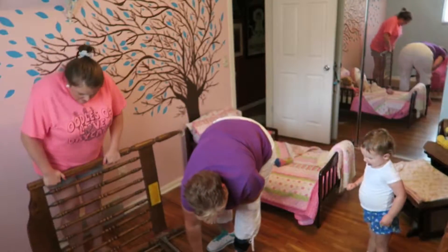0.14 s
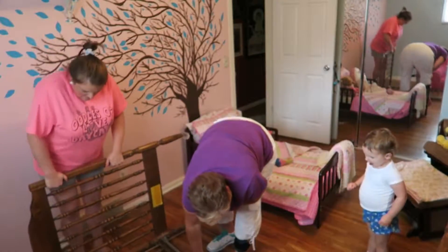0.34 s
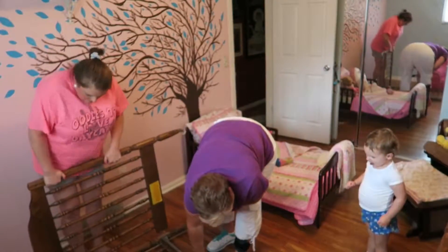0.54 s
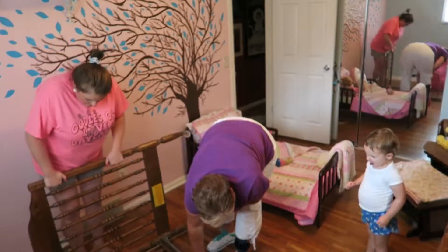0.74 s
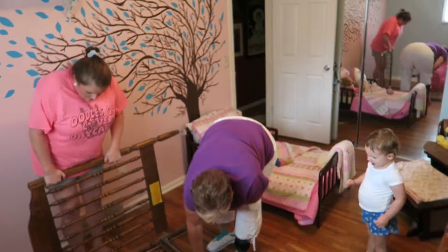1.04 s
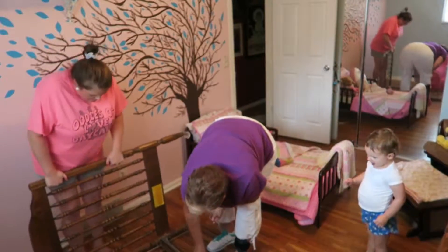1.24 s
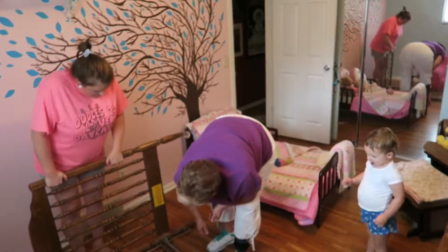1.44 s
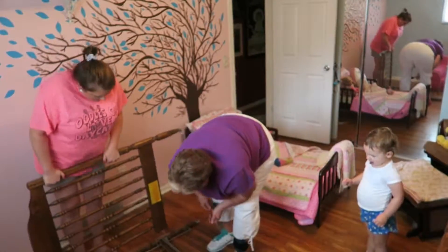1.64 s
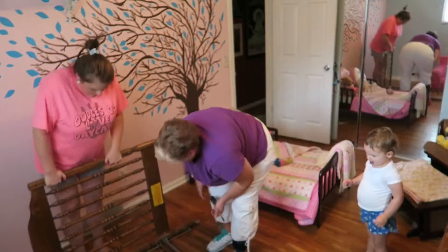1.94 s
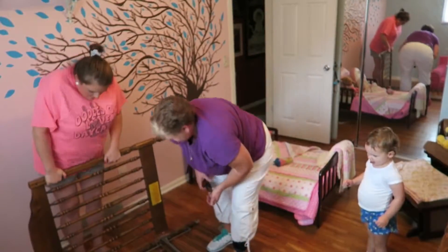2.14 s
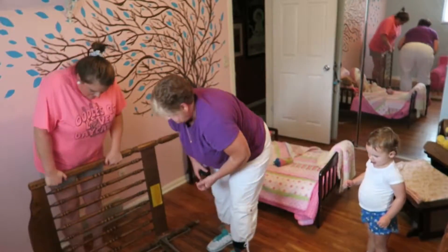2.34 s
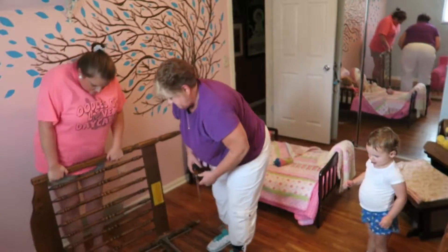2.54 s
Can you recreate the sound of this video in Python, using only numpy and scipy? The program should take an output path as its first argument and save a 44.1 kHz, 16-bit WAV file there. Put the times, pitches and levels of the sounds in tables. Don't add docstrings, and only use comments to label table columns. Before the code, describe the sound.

Sharp wood knocks and heavy floor thuds as a crib is pried apart in a bedroom

```python
import sys
import numpy as np
from scipy import signal
from scipy.fft import rfft, irfft
from scipy.io import wavfile
from scipy.ndimage import uniform_filter1d

SR = 44100
rng = np.random.default_rng(int(sys.argv[2]) if len(sys.argv) > 2 else 0)


def magnitude_from_level(level_db):
    exponent = np.asarray(level_db, float) / 20
    return 10 ** exponent


def output_pcm(signal):
    pcm = np.clip(np.atleast_2d(signal).T, -1, 1) * 32767
    wavfile.write(sys.argv[1], SR, np.round(pcm).astype(np.int16))


N = 119070


def read(points, hz):
    f, value = np.transpose(points)
    return np.interp(np.log(hz + 1), np.log(f + 1), value)


def evened(x):
    return x / np.sqrt(np.mean(x ** 2) + 1e-20)


def add(mix, start_s, sound):
    part = mix[round(start_s * SR):][:len(sound)]
    part += sound[:len(part)]


def colour(x, points):
    gain = magnitude_from_level(read(points, np.fft.rfftfreq(x.shape[-1], 1 / SR)))
    return irfft(rfft(x) * gain, x.shape[-1])


def rings(modes, t, spread=0., spread_db=0.):
    hz, db, t60_s = np.transpose(modes)[:, :, None]
    vary = rng.standard_normal((len(modes), 2))
    envelope = magnitude_from_level(db + spread_db * vary[:, :1] - 60 * t / t60_s)
    return (envelope * np.sin(2 * np.pi * hz * (1 + spread * vary[:, 1:]) * t)).sum(0)


def burst(t, hz, octaves, decay_s):
    away = np.log2((np.fft.rfftfreq(len(t), 1 / SR) + 1) / hz) / octaves
    half = np.exp(-t / decay_s / 2)
    phase = np.angle(rfft(rng.standard_normal(len(t)) * half ** 2))
    hump = irfft(np.exp(1j * phase) / (1 + away ** 6), len(t)) * np.sqrt(half)
    hump *= np.sqrt(decay_s * SR / 2) / np.linalg.norm(hump)
    return hump * np.minimum(t * hz / 2, 1)


def knock(start_s, db, hz, treble_db, body_db):
    contacts, spacing_s = 6, .002
    crack_octaves, crack_s, body_hz, body_s, snap_s = 0.54, 0.0045, 698, 0.0065, .009
    ring_db, ring_per_db, ring_t60_s = -3, .3, 0.051
    thin = hz > 2550
    t = np.arange(4000) / SR

    u = rng.random((contacts, 2))
    at = (u[:, 0] * np.arange(contacts) * spacing_s * SR).astype(int).clip(0, 599)
    hits = np.zeros(600)
    hits[at] = (0.24 + u[:, 1]) * 0.62 ** np.arange(contacts)
    hits[0] = 1

    crack = burst(t, hz, crack_octaves / (1 + thin), crack_s) / 2
    body = magnitude_from_level(body_db) * burst(t, body_hz, 1.0, body_s) / 2
    snap = magnitude_from_level(treble_db - 12.0) * burst(t, 3640, 1.184, snap_s) * np.minimum(t / 0.0034, 1)
    ring = magnitude_from_level(ring_db + ring_per_db * db - 60 * t / ring_t60_s) * np.sin(2 * np.pi * hz * t)
    sound = crack + body + thin * ring * np.minimum(t * hz / 2, 1)
    return start_s, magnitude_from_level(db + 1) * (signal.fftconvolve(sound, hits)[:len(t)] + snap)


def scrape():
    start_s, end_s, db, grow_db, slips_per_s = .524, .606, -16, 1, 250
    sag, limp_share = .22, .15
    # mode in Hz, level in dB, t60 in seconds.
    slat_modes = [(736, 6.5, 0.014), (482, 3, 0.015), (1000, 6.5, 0.014), (1232, 7, 0.018),
                  (1350, -1.5, 0.022)]
    t = np.arange(0, end_s - start_s, 1 / SR)
    done = t / t[-1]
    wander = .5 * uniform_filter1d(rng.standard_normal(N), 200)[:len(t)]
    turns = np.floor(np.cumsum(slips_per_s * (1 - sag * done + wander)) / SR)
    limp = 1 - limp_share * done * (turns % 2)
    slips = limp * np.diff(turns, prepend=-1) * (.85 + .3 * rng.random(len(t)))
    slips += .02 * rng.standard_normal(len(t))
    n = np.arange(3000)
    ring = rings(slat_modes, n / SR) * np.minimum(n / 44, 1) ** 2
    return start_s, magnitude_from_level(db) * signal.fftconvolve(slips * magnitude_from_level(grow_db * done), ring)


def rattle():
    contacts_per_s, rattle_db, shake_db, shake_follow = 360, -6, -35, 0.94
    # time in seconds, level in dB.
    shaking = [(0, -36), (0.299, -33.5), (0.418, -26), (0.498, -33.5), (0.849, -36.5), (.96, -43.5),
               (1.2, -41.5), (1.389, -40.5), (1.45, -84), (1.699, -55), (1.757, -27), (1.971, -49),
               (2.038, -38.5), (2.188, -47.5), (2.398, -31), (2.55, -43.5), (2.7, -41)]
    # frequency in Hz, density in dB per Hz.
    slat_tone = [(240, -38.5), (400, 10), (502, 0.5), (841, 1.5), (2540, 5), (6130, -13.5), (15000, -60)]
    floor_tone = [(25, -31.0), (62, 10.5), (130, 2.5), (300, -2.0), (450, -23.5), (2000, -51.0)]
    level_db = np.interp(np.arange(N) / SR, *np.transpose(shaking))
    clicks = (rng.random(N) < contacts_per_s / SR).astype(float)
    decay = np.exp(-np.arange(300) / SR / 0.0025)
    grains = signal.fftconvolve(clicks, decay)[:N] * rng.standard_normal(N)
    loose = magnitude_from_level(level_db + rattle_db) * evened(colour(grains, slat_tone))
    tremble = evened(colour(rng.standard_normal(N), floor_tone))
    return loose, magnitude_from_level(shake_db + shake_follow * (level_db + 43.5)) * tremble


def thud(start_s, db, hz, rail_db):
    deep_hz, deep_db, deep_t60_s, board_t60_s, rise_s = 65, -9.5, 0.22, .2, .007
    # mode in Hz, level in dB, t60 in seconds.
    rail_modes = [(145.6, 2, 0.13), (214.4, -9, 0.26), (245.7, 3.5, 0.1), (295.9, -4, 0.13),
                  (355.7, -8.5, 0.21), (523, -17.5, 0.16)]
    t = np.arange(SR // 2) / SR
    floor_modes = [(hz, 0, board_t60_s * (deep_hz / hz) ** 2), (deep_hz, deep_db, deep_t60_s)]
    boards = rings(floor_modes, t) * (1 - np.exp(-t / rise_s)) ** 2
    rail = magnitude_from_level(rail_db) * rings(rail_modes, t, spread=0.043, spread_db=2.) / 2
    rail *= magnitude_from_level(-1.0) * (1 - np.exp(-t / 0.0037)) ** 2
    return start_s, magnitude_from_level(db + 6.5) * (boards + rail)


def slam(start_s, db, hz, t60_s):
    t = np.arange(SR // 3) / SR
    return start_s, rings([(hz, db, t60_s)], t) * (1 - np.exp(-t / .0004))


def chink(start_s, db, share):
    bright_above_hz, bright_per_db = 8000, .8
    # mode in Hz, level in dB, t60 in seconds.
    fitting_a = [(6008, 0, .16), (9211, -8, .17), (10900, -10, .08)]
    fitting_b = [(6885, 0, .24), (4250, -10, .06)]
    t = np.arange(SR // 3) / SR
    struck = [(hz, mode_db + (hz > bright_above_hz) * bright_per_db * (db + 25), t60_s)
              for hz, mode_db, t60_s in fitting_a]
    ring = (1 - share) * rings(struck, t, spread_db=1.) + share * rings(fitting_b, t, spread_db=1.)
    buzz = magnitude_from_level(50 * uniform_filter1d(rng.standard_normal(len(t)), size=150))
    return start_s, magnitude_from_level(db + 1.5) * buzz * ring * (1 - np.exp(-t / 0.0004))


def room(x):
    # frequency in Hz, t60 in seconds.
    room_t60 = [(60, 0.86), (300, 0.35), (3000, 0.21), (14000, 0.27)]
    taps = np.zeros((2, SR))
    at = np.arange(100, SR - 20, 20) + rng.integers(0, 20, (2, (SR - 101) // 20))
    np.put_along_axis(taps, at, rng.choice([-1., 1.], at.shape), 1)
    hz, t, z = signal.stft(taps, SR, nperseg=256)
    decay = magnitude_from_level(-60 * t / read(room_t60, hz)[:, None])
    tail = signal.istft(z * decay, SR, nperseg=256)[1]
    return signal.fftconvolve(x[None], tail / np.linalg.norm(tail[0]), axes=1)[:, :N]


def rumble():
    # frequency in Hz, density in dB per Hz.
    house_tone = [(18, -48), (30, 7.5), (125, 3), (350, -12.5), (510, -33.5), (2290, -34.5), (12000, -70.5),
                  (15600, -108.5), (22000, -120)]
    return magnitude_from_level(-39.5) * evened(colour(rng.standard_normal((2, N)), house_tone))


def scene():
    # start in seconds, peak in dB, pitch in Hz, treble in dB, body in dB.
    knocks = [(0.157, -13.5, 1920, -15.5, -15), (0.231, 0.5, 2782, -47, -33), (0.329, -9.5, 1460, -9, -31),
              (0.3495, -3.5, 2130, -45, -9.5), (0.7565, -10, 2144, -51, -31),
              (0.608, -7.5, 2460, -14.5, -2), (0.976, -1.5, 2300, -1.5, -6), (0.9803, 6.5, 2284, -17.5, -9),
              (1.1875, -23, 2790, -1.5, -23), (1.3048, -26.5, 1340, -16, -35),
              (1.551, -27.5, 1700, -47, -5), (1.728, -18, 1370, -30, 1.5), (1.822, -18.5, 2710, -2.5, -9),
              (1.995, -27, 2170, -19, 8.5), (2.2095, -4, 2370, -12.5, -16), (2.319, -16.5, 2670, -0.5, -8),
              (2.5676, -24, 2030, -30, -4), (2.6265, -21.5, 2380, -11.5, -21)]
    # start in seconds, peak in dB, pitch in Hz.
    more_knocks = [(.005, -23, 2180), (0.089, -21.5, 2260), (.234, -7, 1856), (0.239, -21, 2790),
                   (0.258, -15, 2545), (0.373, -6, 1500), (0.393, -12, 1370), (.539, -9.5, 2370),
                   (.580, -6.5, 2500), (0.613, -13, 2290), (0.779, -23, 2350), (0.828, -16, 1990),
                   (0.97, -11.5, 2220), (.992, -10.5, 1500), (1.056, -14, 2530), (1.08, -22, 2330),
                   (1.188, -36, 4470), (1.235, -48, 2730), (1.2553, -28, 2790), (1.331, -27.5, 1964),
                   (1.368, -28, 1920), (1.574, -30.5, 1630), (1.6, -51, 4460), (1.684, -39, 1350),
                   (1.719, -33, 1300), (1.696, -38, 2870), (1.736, -19, 2370), (1.79, -50, 2440),
                   (1.883, -23, 2542), (2.006, -27, 2000), (2.025, -27.5, 2150), (2.088, -55, 2680),
                   (2.216, -14.5, 2566), (2.228, -7.5, 2260), (2.366, -19.5, 1760), (2.443, -26.5, 2700),
                   (2.672, -25.5, 1470)]
    # start in seconds, level in dB, floor pitch in Hz, rail in dB.
    thuds = [(0.238, -12, 62, -2), (0.331, 0.5, 96, -9), (.368, -12, 72.4, 2), (.265, -12, 62, -5),
             (0.411, -6, 66, -8.5), (.443, -10.5, 62.1, -6), (0.512, -15.5, 69.4, 1.5),
             (.6085, -2.5, 98.7, -0.5), (0.714, -36.5, 70.6, -34), (0.764, -19.5, 76, -7.5),
             (0.821, -14, 74.7, -3), (.973, 4, 83.2, -4), (1.1, -22, 69.5, -1.5),
             (1.291, -18.5, 75.8, -3.5), (1.556, -39, 61.2, -16), (1.727, 3, 89.4, -8),
             (1.798, -15, 91, -10.5), (1.870, -48, 91.5, -10), (1.992, -5, 86, -5.5),
             (2.037, -24.5, 67.5, 5.5), (2.066, -25, 93, 0), (2.223, 4.5, 90.5, -8.5),
             (2.296, -31, 74, -21), (2.362, -12.5, 81.2, -2), (2.398, -15.5, 87, -13)]
    # start in seconds, level in dB, pitch in Hz, t60 in seconds.
    slams = [
        (.6092, 6.5, 94, 0.098),
        (.6092, -4.5, 328.5, 0.14),
        (.9795, -0.5, 298.4, 0.16),
        (.9795, -17.5, 130, 0.071),
        (.98, -18, 540, .07),
        (.98, -11, 784, 0.17),
        (.98, -1, 1351, 0.045),
    ]
    # start in seconds, level in dB, share of fitting B (0-1).
    chinks = [
        (.090, -40.5, 0.13),
        (0.357, -26, 0.22),
        (0.542, -30, 0.05),
        (0.581, -36, 0.3),
        (.830, -56, 1),
        (1.287, -52.5, 0.7),
        (1.348, -66, 0.95),
        (1.78, -65, 0.2),
        (2.581, -57, 0.1),
        (2.63, -42.5, 0),
    ]
    # frequency in Hz, side minus mid in dB.
    side_tone = [(60, -64.5), (180, -19), (550, -17.5), (1650, -18), (4970, -6.5), (15000, 1)]
    wood, metal, floor = np.zeros((3, N))
    for row in knocks:
        add(wood, *knock(*row))
    for row in more_knocks:
        add(wood, *knock(*row, treble_db=-14.5, body_db=-6))
    add(wood, *scrape())
    loose, shake = rattle()
    wood += loose
    for row in thuds:
        add(floor, *thud(*row))
    for row in slams:
        add(floor, *slam(*row))
    for row in chinks:
        add(metal, *chink(*row))
    wet = room(wood + magnitude_from_level(-19) * metal + magnitude_from_level(-15) * floor) + rumble()
    mid = wood + metal + floor + shake + wet[0]
    late = signal.hilbert(mid).imag
    side = colour(magnitude_from_level(2) * late + magnitude_from_level(-2.0) * wet[1], side_tone)
    return np.array([mid + side, mid - side])


def low_pass(x):
    return signal.sosfilt(signal.butter(12, 20000, fs=SR, output="sos"), x)


def record(dry):
    # frequency in Hz, response in dB.
    mic_tone = [(20, -13.5), (60, -2), (14500, 1.5), (16500, -29), (21000, -69)]
    return low_pass(np.clip(colour(dry, mic_tone), -1.0, 1.0))


dry = scene()
out = record(dry)
output_pcm(out)
```